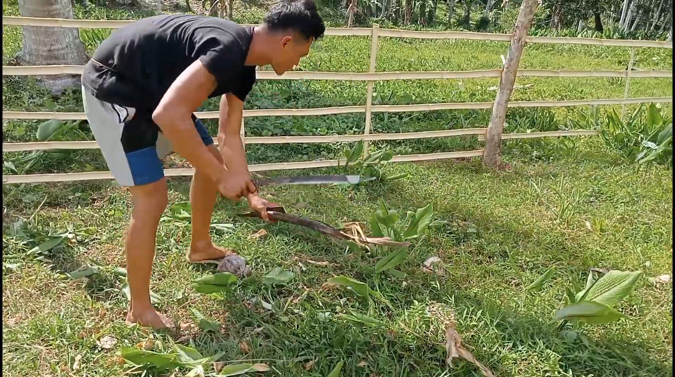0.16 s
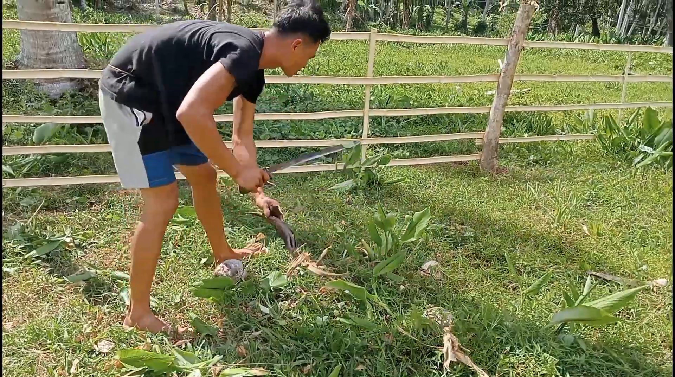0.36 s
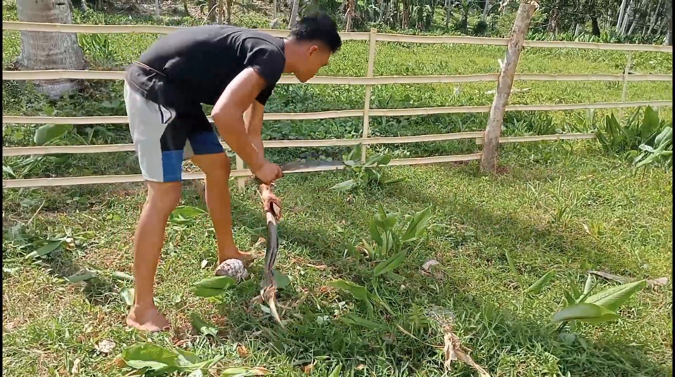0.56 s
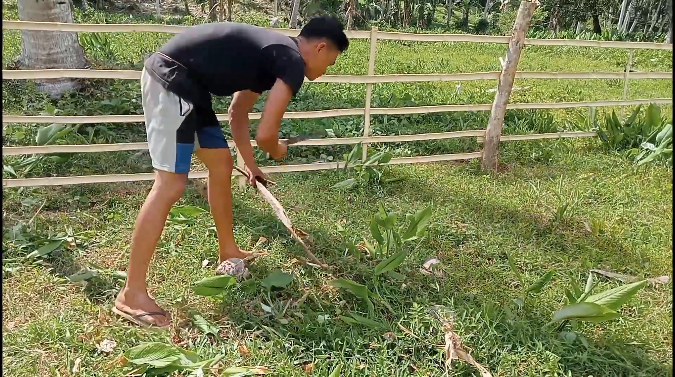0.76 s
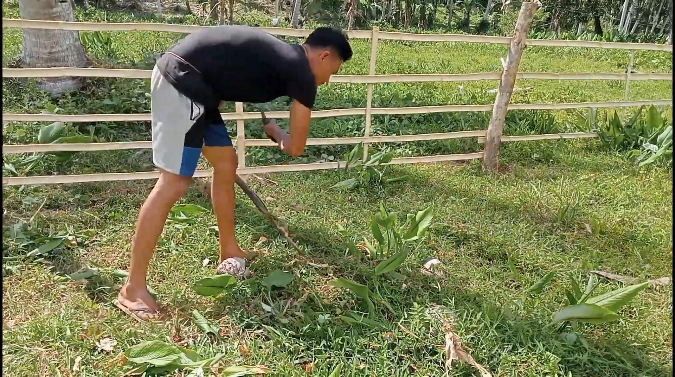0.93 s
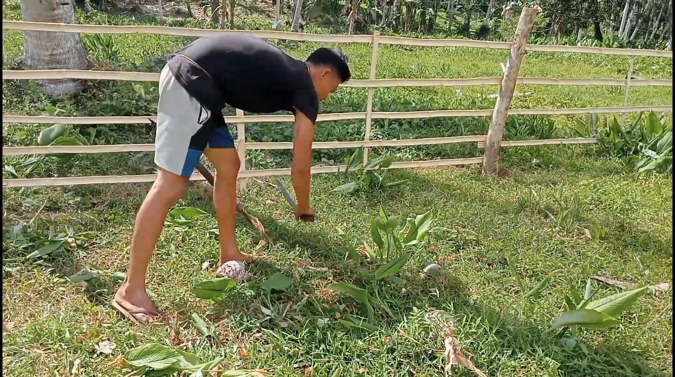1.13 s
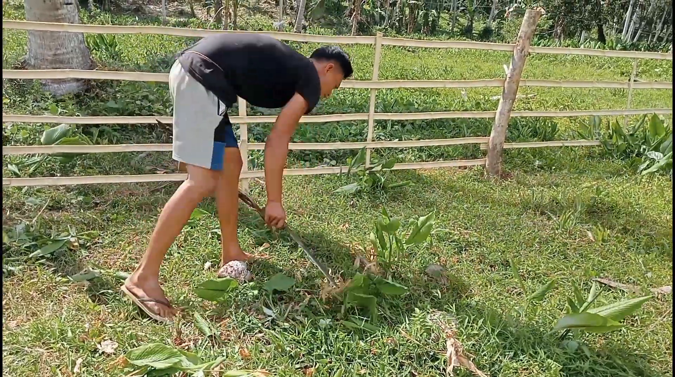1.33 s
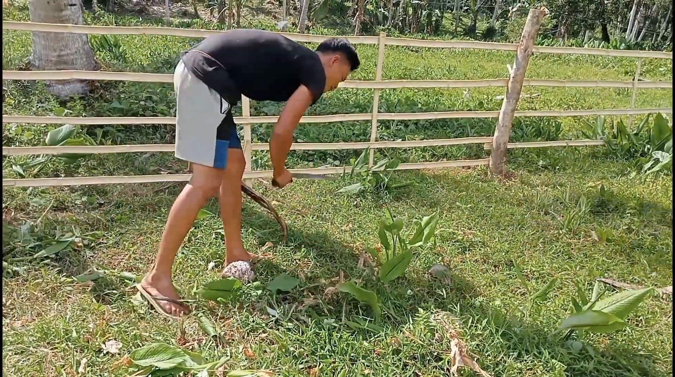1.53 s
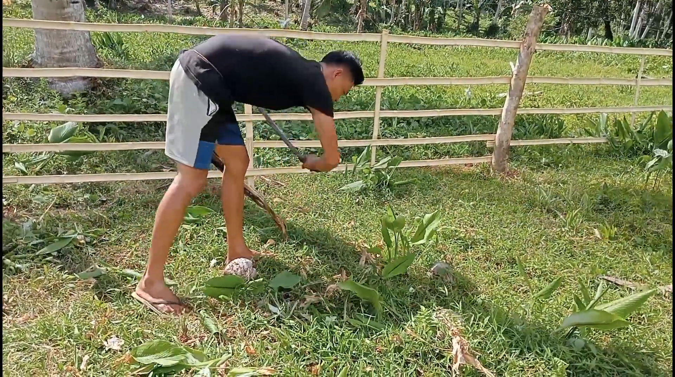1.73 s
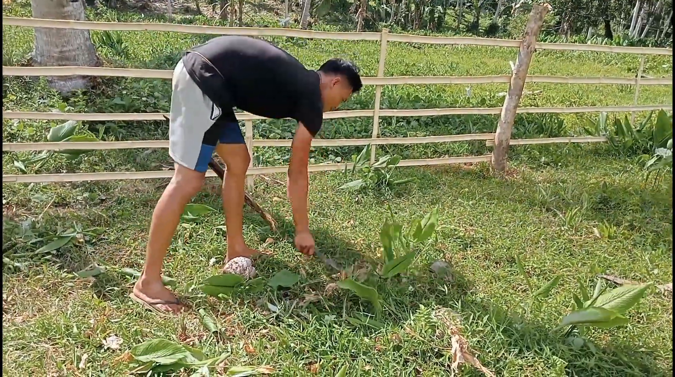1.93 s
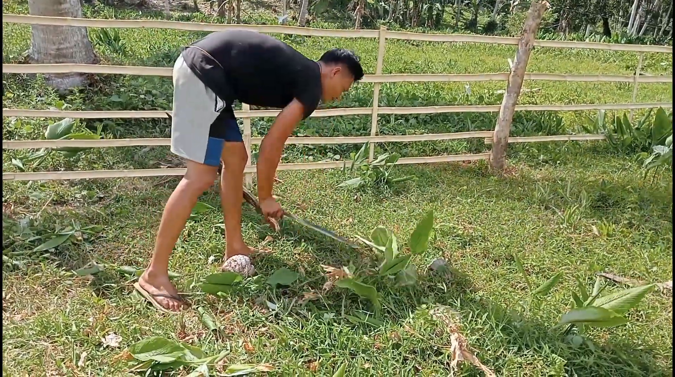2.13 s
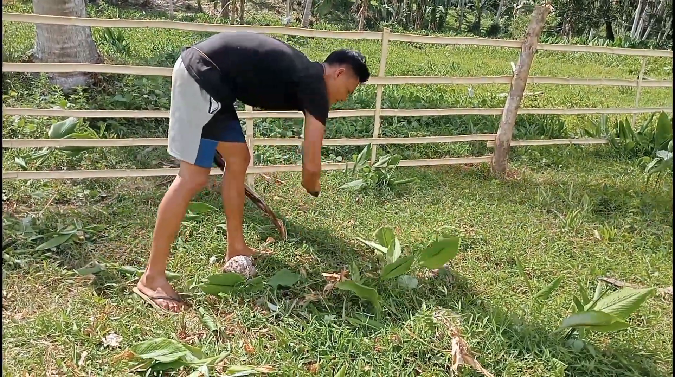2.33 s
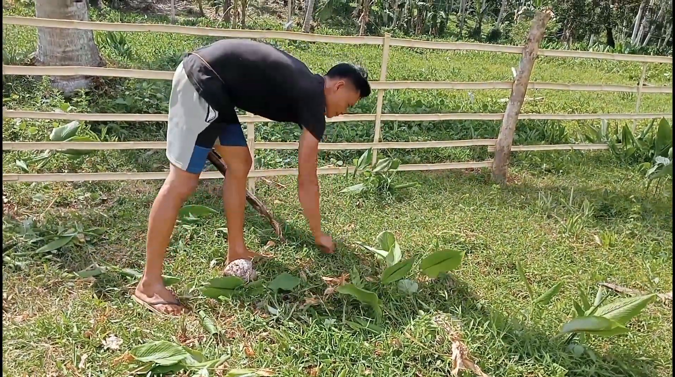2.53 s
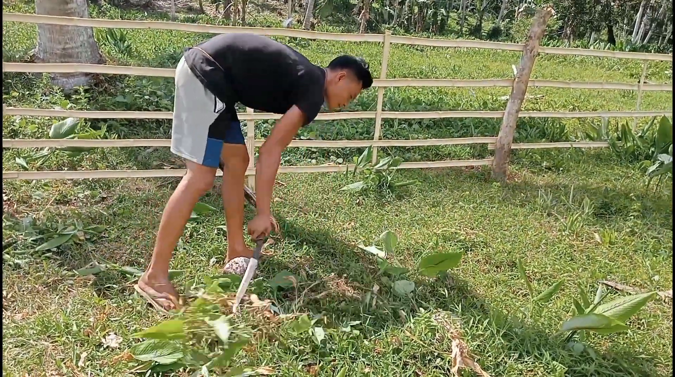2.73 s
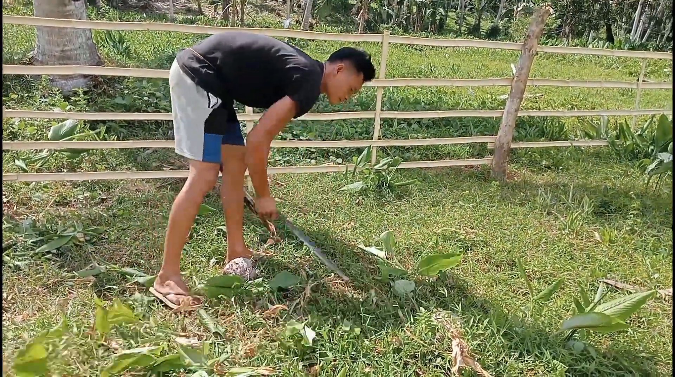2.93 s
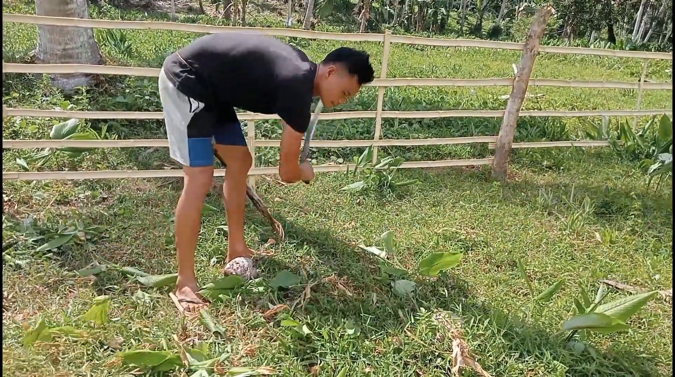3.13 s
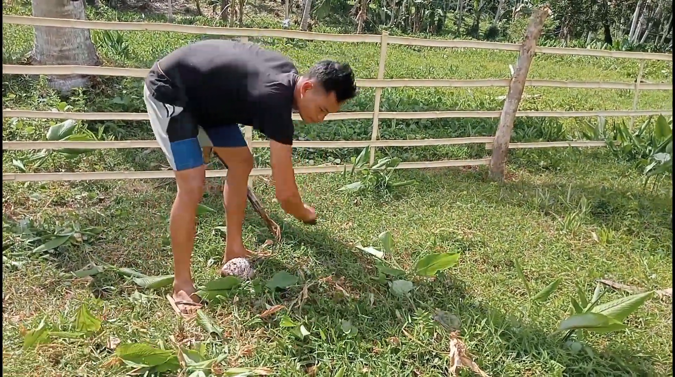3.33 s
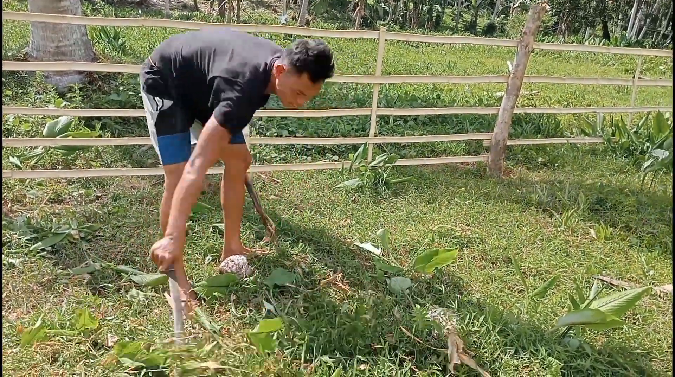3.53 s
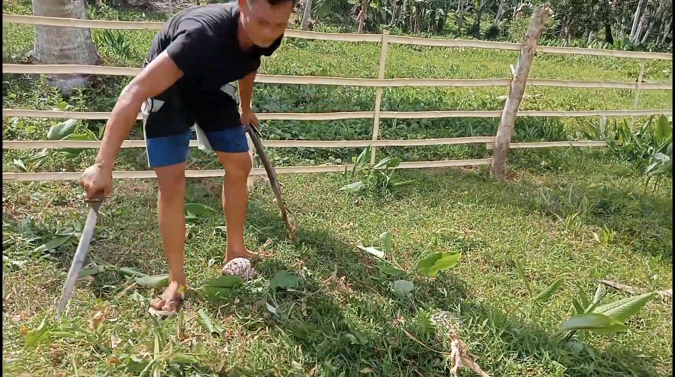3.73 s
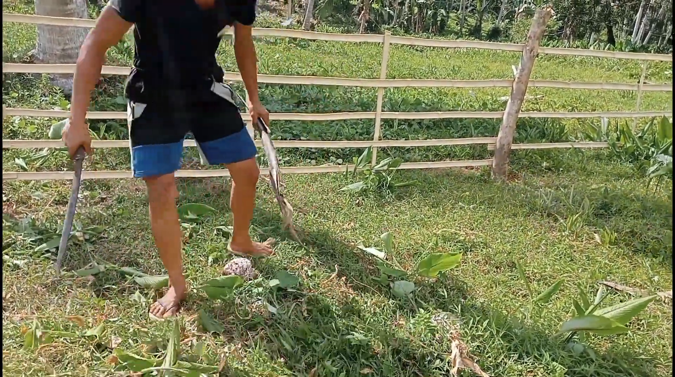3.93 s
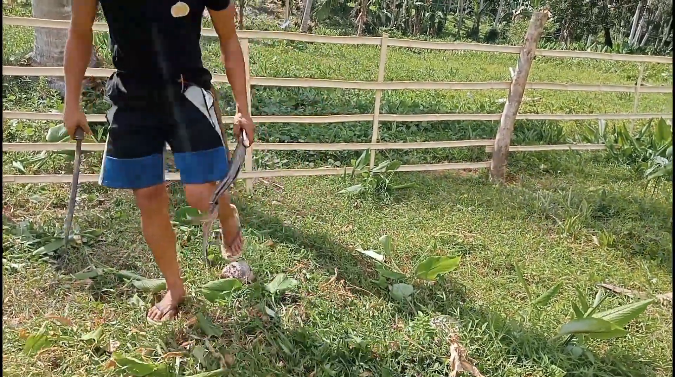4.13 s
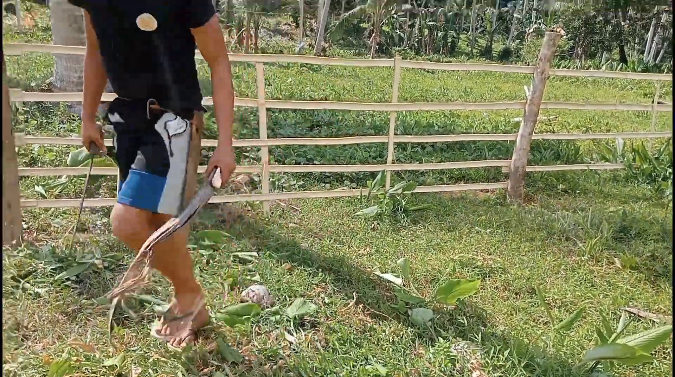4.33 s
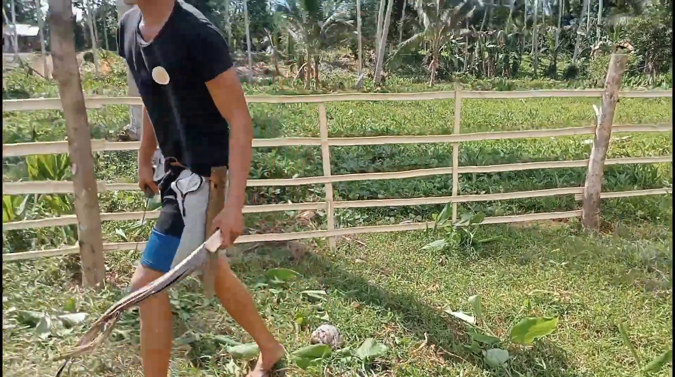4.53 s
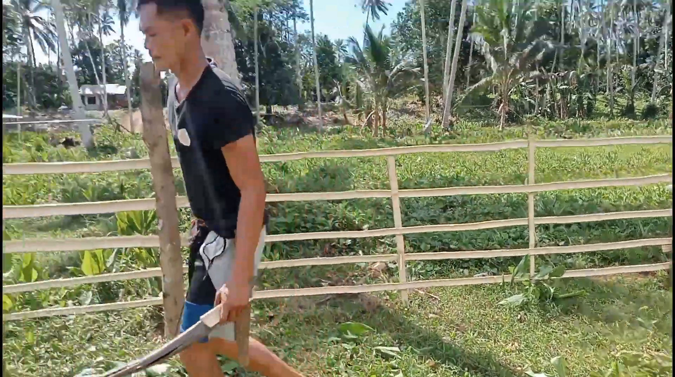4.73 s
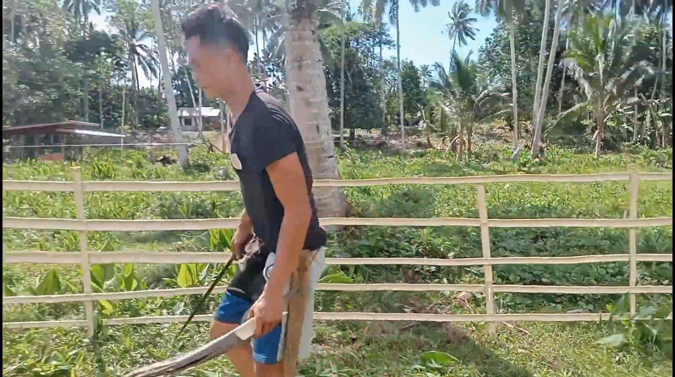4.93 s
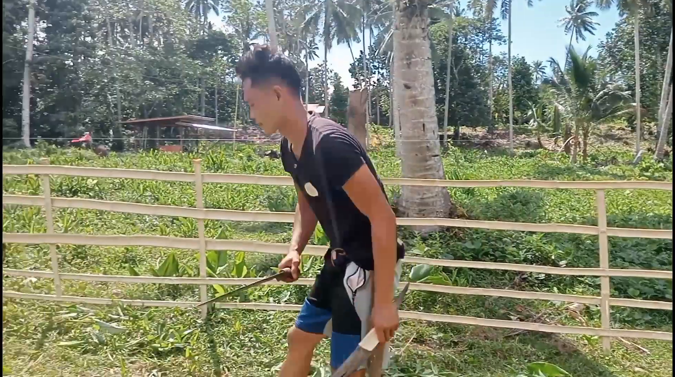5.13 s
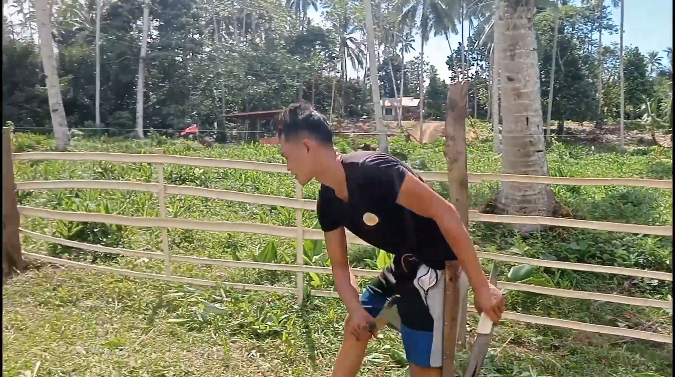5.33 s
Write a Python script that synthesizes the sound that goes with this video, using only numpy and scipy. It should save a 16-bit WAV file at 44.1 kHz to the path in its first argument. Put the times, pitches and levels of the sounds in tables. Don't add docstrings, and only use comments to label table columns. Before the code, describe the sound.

Four sharp, crackling blade chops through green stems outdoors, amid low wind thumps, dry snaps, one steel ping on stone and faint birds.

```python
import sys
import numpy as np
from scipy import signal
from scipy.fft import rfft, irfft
from scipy.io import wavfile
from scipy.ndimage import uniform_filter1d

SR = 44100
rng = np.random.default_rng(int(sys.argv[2]) if len(sys.argv) > 2 else 0)


def natural_amplitude(level_db):
    exponent = np.asarray(level_db, float) / 20
    return 10 ** exponent


def pcm_store(signal):
    levels = np.round(np.clip(np.atleast_2d(signal), -1, 1) * 32767)
    wavfile.write(sys.argv[1], SR, levels.astype(np.int16).T)


N = 237431
TIME = np.arange(N) / SR


def unit(x):
    return x / np.sqrt(np.mean(x ** 2))


def colour(x, points):
    hz, db = np.transpose(points)
    f = np.fft.rfftfreq(len(x), 1 / SR) + 1
    gain = natural_amplitude(np.interp(np.log(f), np.log(hz), db))
    return irfft(rfft(x) * gain, len(x))


def tilted(x, tilt_db, pivot_hz=5000):
    return colour(x, [(pivot_hz / 16, -4 * tilt_db), (pivot_hz * 4, 2 * tilt_db)])


def walk(rate_hz):
    hold = int(SR / rate_hz)
    steps = np.repeat(rng.standard_normal(N // hold + 1), hold)
    smooth = uniform_filter1d(uniform_filter1d(steps, hold), hold)
    return unit(smooth[:N])


def add(out, start_s, sound):
    i = max(int(start_s * SR), 0)
    out[i:i + len(sound)] += sound[:N - i]


# pitch_hz,
# level_db (per Hz)
LEAF_COLOUR = [(150, -41), (260, -15.5), (750, -9), (980, -9.5), (1380, -3.5), (1720, -9.5), (2600, -5),
               (3000, -6), (4500, -4.5), (7400, -7), (9300, -6), (11800, -14.5), (14800, -14),
               (15500, -13.5)]


def crackle(scatter_db, clump_db):
    uneven_db = scatter_db * np.minimum(rng.exponential(size=N), 5)
    size = natural_amplitude(uneven_db + clump_db * walk(600))
    return unit(colour(size * rng.standard_normal(N), LEAF_COLOUR))


# start_s, entry_db, settle_delay_s, settle_db, leafiness_db_per_octave
STROKES = [
    (1.343, -23, 0.1, -40.5, 0.7),
    (2.084, -26, 0.095, -49.5, 0.7),
    (2.741, -23, 0.15, -41.5, 0.1),
    (3.588, -28, 0.1, -40.5, 0),
]
# start_s, level_db, t60_ms, stem_hz
BITES = [(1.354, -14, 84, 6000), (1.362, -7.5, 85, 8900), (1.362, -22.5, 105, 1730),
         (1.378, -30.5, 290, 9400), (1.399, -22.5, 130, 4300), (1.412, -26, 200, 4500),
         (2.0905, -15, 50, 7800), (2.0935, -13, 45, 7400), (2.0972, -9.5, 14, 5000), (2.1, -32, 120, 1200),
         (2.104, -22, 200, 9300), (2.7505, -11.5, 40, 3480), (2.766, -16.5, 300, 9000),
         (2.771, -16.5, 54, 2200), (2.7565, -18, 22, 4000), (2.7805, -10, 48, 4500),
         (2.788, -17.5, 150, 2540), (2.80, -27, 380, 7000), (3.588, -17.5, 190, 11500),
         (3.591, -21.5, 170, 2970), (3.612, -25, 145, 392), (3.607, -11.5, 80, 5000),
         (3.6085, -12.5, 170, 9000), (3.622, -19.5, 110, 4800), (3.635, -27, 310, 9000),
         (3.644, -24, 68, 4000)]


def contacts():
    entries = [(s, db, 314, 5000) for s, db, *_ in STROKES]
    settling = [(s + delay, db, 980, 7000) for s, _, delay, db, _ in STROKES]
    return entries + list(BITES) + settling


# pitch_hz, width_hz, level_db
FIRST_PLANT = [(1390, 88, -15), (2300, 27, -16), (3200, 51, -5), (4000, 26, -6), (5590, 43, -5),
               (6400, 75, -8)]
SECOND_PLANT = [(1400, 55, -11), (2070, 110, 5), (3360, 30, 3), (4340, 60, 4), (5360, 83, 9),
                (6360, 70, -5)]
THIRD_PLANT = [(1150, 33, -17), (2585, 31, -5), (3480, 150, 1), (4720, 48, -4), (5430, 170, -7),
               (6400, 48, -7)]
FOURTH_PLANT = [(427, 28, -23), (2600, 71, -7), (4500, 29, -24), (4800, 31, -9), (5700, 120, -22),
                (6400, 25, -12)]


def slashes():
    out, t = np.zeros(N), TIME[:SR // 2]
    plants = (FIRST_PLANT, SECOND_PLANT, THIRD_PLANT, FOURTH_PLANT)
    tear = crackle(scatter_db=2.5, clump_db=2.0)
    grid_hz = 250 * 2 ** np.arange(0, 6.2, 0.04)
    for k, (s, db, t60_ms, stem_hz) in enumerate(contacts()):
        stroke = np.searchsorted((2, 2.5, 3.3), s)
        rise_ms = 1.3 + (t60_ms / 180) ** 2
        fade = natural_amplitude(-60000 * t / t60_ms) * (1 - 2 * t)
        shape = np.minimum(1000 * t / rise_ms, 1) * fade

        tilt_db = max(4 * np.log2(stem_hz / 4000) + STROKES[stroke][-1], -7)
        octaves_off = np.log2(grid_hz / stem_hz)
        stem_db = 3.0 * np.exp(-(octaves_off / 0.32) ** 2)
        wood_db = 0
        for hz, width_hz, level_db in plants[stroke]:
            distance = (grid_hz - hz) / (0.4 * width_hz + 40)
            wood_db = wood_db + (7 + 0.5 * level_db) / (1 + distance ** 2)
        body_db = tilt_db * octaves_off + stem_db + wood_db

        fibres = np.roll(tear, -7919 * k)[:len(t)]
        add(out, s, natural_amplitude(db) * shape * unit(colour(fibres, np.c_[grid_hz, body_db])))
    return out


# start_s, pitch_hz, peak_db, t60_ms
KNOCKS = [(1.364, 280, -21, 45), (1.364, 736, -20, 27), (1.364, 1390, -27, 40), (0.98, 343, -35, 36),
          (2.096, 795, -26.5, 33), (2.094, 1400, -19, 29), (2.096, 2090, -24.5, 44),
          (2.751, 290, -23.5, 48), (2.751, 1990, -18, 47), (2.79, 405, -23.5, 72), (2.793, 1430, -23, 50),
          (3.607, 267, -25.5, 60), (3.606, 436, -22, 66), (3.607, 740, -17, 28), (3.606, 1180, -21.5, 39)]


def knocks():
    out, t = np.zeros(N), TIME[:3000]
    push = np.minimum(t / 0.0013, 1)
    for s, hz, db, t60_ms in KNOCKS:
        add(out, s, natural_amplitude(db - 60000 * t / t60_ms) * np.sin(2 * np.pi * hz * t) * push)
    return out


def debris():
    out, t = np.zeros(N), TIME[:200]
    for s in (1.38, 2.11, 2.81, 2.93, 3.64):
        for late, size, pitch in rng.random((45, 3)):
            hz = 2500 * 2 ** (2.3 * pitch)
            db = -36 - 16 * late - 10 * size
            tick = natural_amplitude(db - 60 * t / 0.003) * np.sin(2 * np.pi * hz * t)
            add(out, s + 0.57 * late ** 1.1, tick)
    return out


# start_s, peak_db, low_hz, high_hz
SNAPS = [(.128, -45, 10000, 15000), (.656, -33, 7000, 14100), (.680, -15.5, 5000, 15900),
         (.688, -36, 4000, 12000), (.967, -37, 4000, 15000), (1.792, -34, 4300, 6200),
         (2.030, -33, 7000, 16000), (2.167, -38, 2500, 10000), (2.382, -24.5, 4940, 15000),
         (2.424, -40, 2500, 2930), (2.97, -26, 2000, 7500), (3.002, -31.5, 8500, 10500),
         (3.086, -42, 4000, 14000), (3.67, -34, 7500, 10500), (3.776, -30.5, 5000, 16000),
         (3.888, -26, 885, 3360), (3.933, -30, 3000, 9000), (3.993, -33, 5000, 7000),
         (4.133, -32.5, 1100, 3000), (4.2374, -25, 5960, 10000), (4.287, -19.5, 3200, 10600),
         (4.311, -29, 7400, 10900), (4.712, -26.5, 1000, 8000), (4.902, -39, 1000, 2600),
         (4.928, -36, 1810, 2920), (4.984, -42, 9000, 16000), (4.994, -28, 5000, 16000),
         (5.007, -35, 4300, 5700),
         (0.548, -38.5, 3420, 4600), (0.685, -30.5, 5000, 8000), (1.207, -42, 3000, 4500),
         (1.896, -40, 5000, 12000), (2.087, -22, 3000, 10000), (2.213, -36, 3500, 6000),
         (2.298, -47, 2600, 3170), (2.364, -35, 1100, 3000), (2.393, -38, 8000, 9500),
         (2.444, -35, 3000, 9000), (2.928, -35, 6300, 9600), (2.993, -35, 12000, 15000),
         (3.517, -45, 3300, 4200), (3.608, -10, 300, 10000), (3.679, -27, 4000, 8000),
         (3.692, -36, 6000, 10000), (3.722, -33, 1980, 5000), (3.747, -36, 4000, 8000),
         (4.18, -38, 7500, 9500), (4.281, -39, 7000, 10000), (4.455, -42, 8000, 9000),
         (4.738, -37, 2000, 6000), (4.94, -42, 1700, 2400), (4.966, -35, 4000, 7000),
         (4.985, -39.5, 3200, 4000), (1.3567, -10, 3000, 9000), (1.3657, -8, 4000, 10000),
         (1.401, -16, 2000, 6000), (1.416, -21, 2500, 8000), (2.093, -10, 5000, 10000),
         (2.0978, -7, 3500, 6500), (2.7515, -8, 1500, 6000), (2.7835, -8, 2000, 6000),
         (2.792, -15, 2000, 5000), (2.7985, -15.5, 800, 2500), (2.845, -24, 4000, 10000),
         (2.875, -32, 7000, 10000), (3.03, -37, 9400, 11500), (3.103, -37, 5000, 9500),
         (3.179, -41, 7500, 10000), (3.6165, -9, 4000, 10000), (3.624, -15, 3500, 6000)]


def snaps():
    out, t = np.zeros(N), TIME[:1800]
    events = SNAPS
    spray_fade = natural_amplitude(-60000 * t / 14.4)
    for (s, db, low_hz, high_hz), noise in zip(events, rng.standard_normal((len(events), len(t)))):
        burst = 0.22 * noise * spray_fade + (t == 0)
        stalk = signal.butter(2, [low_hz, high_hz], "band", fs=SR, output="sos")
        click = signal.sosfilt(stalk, burst)
        add(out, s, natural_amplitude(db) * click / np.abs(click).max())
    return out


# start_s, level_db, tilt_db_per_octave
PINGS = [
    (2.948, -26, -45),
    (3.0445, -17, .1),
]
# pitch_hz, level_db, t60_s
BLADE = [(4110, -16.5, .028), (4980, -20, 0.074), (6860, -7, 0.024), (7800, -6, 0.034), (8840, 0, 0.016),
         (9600, -9, 0.022)]


def blade():
    out, t = np.zeros(N), TIME[:3000]
    for s, db, tilt_db in PINGS:
        ring = np.zeros(len(t))
        for hz, tone_db, t60 in BLADE:
            bright_db = tilt_db * max(np.log2(hz / 6800), 0)
            ring += natural_amplitude(tone_db + bright_db - 60 * t / t60) * np.sin(2 * np.pi * hz * t)
        add(out, s, natural_amplitude(db) * ring * np.minimum(t / 0.00039, 1))
    return out


# middle_s, level_db, half_length_s, tilt_db_per_octave
BRUSHES = [(.15, -54.5, .45, -2), (.51, -49.5, 0.16, -1), (0.69, -44.5, 0.034, 0), (0.945, -47, 0.1, 2),
           (1.3, -54, 1, -2.5), (1.9, -50.5, 0.07, -1), (2.035, -46, 0.023, 1.5), (2.38, -49.5, .03, -3),
           (2.404, -50, 0.063, 1.5), (2.485, -55, .04, -2), (2.5, -62, 0.26, -8), (2.983, -45.5, 0.31, -1),
           (3.076, -41, 0.072, 3.5), (3.17, -47, 0.13, 3.5), (3.497, -54.5, 0.62, -3),
           (3.788, -45, 0.074, 2), (3.98, -45.5, 0.2, 0.5), (4.15, -45.5, 0.088, .5),
           (4.306, -49, 0.16, -1), (4.48, -57, .25, -1), (4.632, -42, 0.043, 1.5), (4.675, -40, 0.054, 2.5),
           (4.718, -44, 0.06, 0), (4.885, -59, 0.027, 0), (4.935, -49.5, 0.049, -1), (4.99, -53, .08, 2),
           (5.271, -47, 0.059, 1.5)]


def rustle():
    total, leaning = 0, 0
    for s, db, half_s, tilt_db in BRUSHES:
        power = natural_amplitude(db - 15 * ((TIME - s) / half_s) ** 2) ** 2 + 1e-12
        total = total + power
        leaning = leaning + power * tilt_db
    grass = crackle(scatter_db=3.3, clump_db=1.3)
    bright = np.clip(0.5 + leaning / total / 8, 0, 1)
    mix = bright * unit(tilted(grass, 4)) + (1 - bright) * unit(tilted(grass, -4))
    return np.sqrt(total) * natural_amplitude(1.6 * walk(90)) * mix


# peak_s, peak_db, rise_s, fall_s
GUSTS = [(.12, -34.5, 0.24, 0.34), (.27, -33.5, 0.25, .1), (.36, -20, 0.069, 0.071),
         (.43, -24, 0.045, 0.046), (.5, -22.5, 0.045, 0.2), (.79, -31, 0.17, 0.13), (1.12, -25, 0.21, 0.03),
         (1.3, -32, 0.18, 0.047), (1.44, -30, 0.088, 0.064), (1.611, -12.5, 0.071, 0.056),
         (1.725, -33, 0.017, .04), (1.84, -20.5, 0.061, 0.17), (2.04, -38, .05, 0.041),
         (2.25, -20.5, 0.13, 0.057), (2.31, -25, 0.11, 0.017), (2.43, -26.5, 0.07, 0.021),
         (2.55, -27, 0.042, 0.077), (2.7, -36, 0.34, 0.53), (2.91, -26.5, 0.092, 0.12),
         (3.18, -24.5, 0.076, 0.034), (3.27, -27, 0.11, 0.13), (3.43, -36, .1, 0.037),
         (3.55, -28.5, 0.021, .035), (3.79, -35, 0.0099, 0.22), (3.99, -42, 0.27, 0.078),
         (4.12, -36, 0.024, 0.22), (4.54, -29, 0.014, .025), (4.79, -41.5, .13, 0.03),
         (5.08, -33.5, 0.16, 0.17), (5.27, -36, 0.069, 0.0087)]


def gusting():
    power = natural_amplitude(-74) ** 2
    for s, db, rise_s, fall_s in GUSTS:
        away = np.maximum((s - TIME) / rise_s, (TIME - s) / fall_s)
        power = power + natural_amplitude(db - 15 * away) ** 2
    return 10 * np.log10(power)


def eddy(hz):
    u = 3.6 * hz * np.arange(-1500, 1500) / SR * 2 / np.pi
    return (3 * u ** 2 - 1) / (1 + u ** 2) ** 3


def eddy_stream(gust_db):
    eddies = np.zeros(N)
    when, size, span, sign = rng.random((1600, 4)).T
    for t, g, h, up in zip(when * TIME[-1], size, span, sign):
        hz = 66 * 2 ** (1.08 * h + (gust_db[int(t * SR)] + 49.0) / 40)
        level = natural_amplitude(-2.2 * np.log(g + 1e-9))
        add(eddies, t, eddy(hz) * level * (1 if up > 0.4 else -1))
    buffet = colour(rng.standard_normal(N), [(40, -40), (70, 2.0), (95, -1.0), (130, -6.0),
                                             (220, -20.5), (450, -26), (700, -78)])
    return unit(unit(eddies) + 0.74 * unit(buffet))


# middle_s, peak_db, pitch_hz
DIPS = [(0.0647, -27, 55.4), (0.311, -19.5, 130), (0.3536, -7.5, 136), (0.3746, -12.5, 114),
        (0.4092, -20, 150), (0.4989, -14, 105), (0.6553, -26.5, 103), (0.7592, -27.0, 150),
        (0.7896, -22.0, 141), (0.8493, -27.5, 147), (0.984, -31.5, 91), (1.0326, -26.5, 192),
        (1.0598, -29, 121), (1.084, -24, 192), (1.1247, -22, 103), (1.2916, -19.5, 146),
        (1.545, -23.5, 197), (1.5913, -10, 143), (1.6187, -14.5, 109), (1.6482, -22.0, 134),
        (1.7928, -26, 129), (1.818, -22.5, 135), (1.8722, -21, 85.4), (1.9088, -25.5, 115),
        (1.9316, -25.5, 146), (1.95, -23, 102), (2.0384, -19, 130), (2.1651, -23.5, 145),
        (2.2152, -18, 123), (2.2339, -26, 134), (2.3047, -24.5, 152), (2.4341, -21, 118),
        (2.6265, -30, 127), (2.6627, -29, 190), (2.8258, -34, 147), (2.8464, -28.5, 119), (2.863, -30, 99),
        (2.9001, -26, 126.2), (2.9285, -26.5, 175), (2.9494, -29, 74), (3.117, -24.5, 99),
        (3.153, -23, 113), (3.1821, -19.5, 116), (3.251, -25, 134), (3.358, -30.0, 158),
        (3.7897, -29.5, 143), (3.9614, -23, 122), (4.1314, -28, 98), (4.1847, -28, 89), (4.261, -29.5, 122),
        (4.536, -23.5, 155), (5.096, -30, 107),
        (0.1794, -27, 230), (.188, -25, 120), (.288, -27, 110), (.386, -17, 190), (0.4472, -23, 210),
           (.487, -24.5, 220), (.543, -23.5, 230), (.623, -26, 95), (1.576, -19, 151), (1.635, -17.5, 171),
           (1.664, -22, 170), (1.717, -29, 95), (1.837, -21.5, 159), (2.4, -30, 156), (2.534, -28, 125),
           (2.603, -31.5, 230), (3.169, -23, 131), (4.548, -31, 107), (5.018, -32, 110)]
# middle_s, peak_db, pitch_hz
SURGES = [(0.086, -27.5, 125), (0.1182, -24, 97), (0.4361, -17, 127), (0.48, -18.5, 136), (0.555, -20, 136),
          (0.7196, -29.0, 130), (0.8091, -26.0, 138), (0.832, -31.0, 131), (1.198, -29, 121),
          (1.2427, -27.0, 116), (1.3119, -28, 140), (1.5726, -28, 57), (1.8534, -18.0, 99),
          (2.1919, -27.5, 158), (2.2547, -17, 151), (2.2804, -21.0, 134), (2.5466, -16.5, 134),
          (2.5723, -21.5, 158), (2.97, -30, 97), (2.9986, -27.5, 100), (3.2292, -21, 182),
          (3.273, -19, 127), (3.291, -23.5, 134), (3.3173, -28, 129), (3.5544, -30.5, 106),
          (3.8316, -30, 107), (3.9032, -29.5, 108), (4.219, -27, 117), (5.0668, -28, 125),
          (5.1326, -27, 94), (5.1772, -22.5, 107), (5.2325, -24.0, 107), (5.2629, -27.5, 103)]


def strong_eddies():
    strong, swept = np.zeros(N), np.zeros(N)
    dips = [(*row, 1) for row in DIPS]
    surges = [(*row, -1) for row in SURGES]
    for s, peak_db, hz, up in dips + surges:
        tip = 0.45 * np.clip((peak_db + 21) / 14, 0, 1)
        core = (1 - tip) * eddy(0.95 * hz) + tip * eddy(2.1 * hz)
        rebound = natural_amplitude(-6.5) * np.roll(eddy(hz), int(SR / hz / 2))
        add(strong, s - 1500 / SR, up * natural_amplitude(peak_db) * (core - rebound))
        add(swept, s - 500 / SR, np.hanning(1000))
    return strong, np.minimum(swept, 1)


def wind():
    gust_db = gusting()
    stream = eddy_stream(gust_db)
    strong, swept = strong_eddies()
    stream_db = np.minimum(gust_db - 5, -30) + 2.5 * walk(28)
    out = strong + stream * natural_amplitude(stream_db) * (1 - 0.8 * swept)
    return signal.sosfiltfilt(signal.butter(2, 55, "high", fs=SR, output="sos"), out)


# start_s, length_s, start_hz, end_hz, level_db
BIRDS = [(0, 0.091, 5250, 5650, -56), (.53, 0.092, 4250, 4700, -56), (0.544, 0.12, 5100, 5700, -58),
         (0.713, 0.046, 5400, 5680, -50), (0.764, 0.13, 4850, 5950, -58), (1.24, .04, 4300, 4600, -56),
         (1.284, 0.055, 4850, 5650, -56), (2.645, 0.022, 2610, 2540, -48.5),
         (3.202, 0.022, 2215, 1950, -47), (3.222, 0.029, 1754, 1780, -53), (3.401, 0.025, 2250, 1760, -46),
         (3.438, .016, 1720, 1790, -46), (3.41, 0.11, 5080, 5450, -55), (4.032, 0.12, 4260, 5360, -55),
         (4.16, 0.07, 5400, 5900, -54), (4.479, 0.11, 5200, 5950, -59)]


def birds():
    out, waver_hz = np.zeros(N), 22 * walk(90)
    for s, length_s, from_hz, to_hz, db in BIRDS:
        u = np.arange(int(length_s * SR)) / (length_s * SR)
        hz = from_hz + (to_hz - from_hz) * u + waver_hz[:len(u)]
        whistle = np.sin(2 * np.pi * np.cumsum(hz) / SR)
        add(out, s, natural_amplitude(db) * np.sin(np.pi * u) ** 0.33 * whistle)
    out = out * natural_amplitude(2 * walk(200))
    return out + 0.25 * np.roll(out, 310) + 0.25 * np.roll(out, 730)


# pitch_hz, level_db (per Hz)
PALM_COLOUR = [(18, -16), (30, -35), (59, -1), (92, -7), (120, -8.5), (213, -17.5), (368, -19.5),
               (1860, -20.5), (5280, -21), (7610, -26), (8900, -23.5), (11600, -36), (15400, -35)]


def palms():
    hiss = colour(rng.standard_normal(N), PALM_COLOUR)
    low = signal.sosfiltfilt(signal.butter(2, 400, fs=SR, output="sos"), hiss)
    high = hiss - low
    scale = natural_amplitude(-49.5) / np.std(high)
    return scale * (natural_amplitude(-0.5 + 1.54 * walk(8.4)) * low + natural_amplitude(0.55 * walk(2.18)) * high)


def scene():
    near = slashes() + knocks() + debris() + snaps() + blade()
    echo = 0.069 * np.roll(near, int(0.0033 * SR))
    return (near + echo + rustle() + wind() + birds() + palms())[None]


def top_cut(x):
    return signal.sosfilt(signal.butter(12, 16660, fs=SR, output="sos"), x)


def record(dry):
    x = 0.75 * np.tanh(dry[0] / 0.75)
    x = colour(x, [(20, 0), (15580, 0), (15750, -32), (16600, -40), (16700, -70)])
    return top_cut(x[None])


dry = scene()
out = record(dry)
pcm_store(out)
```